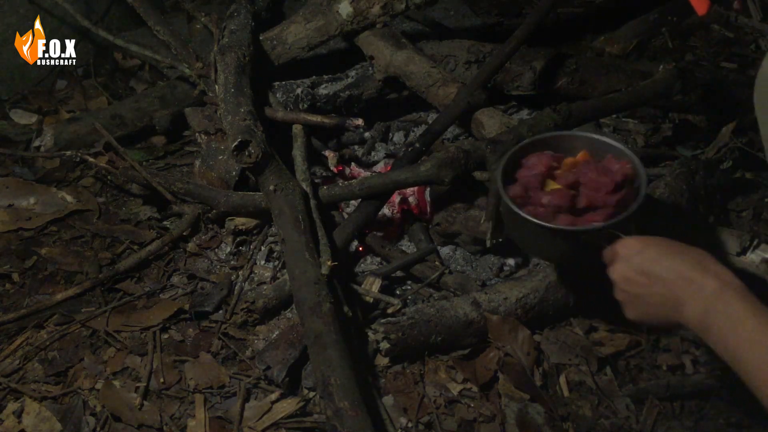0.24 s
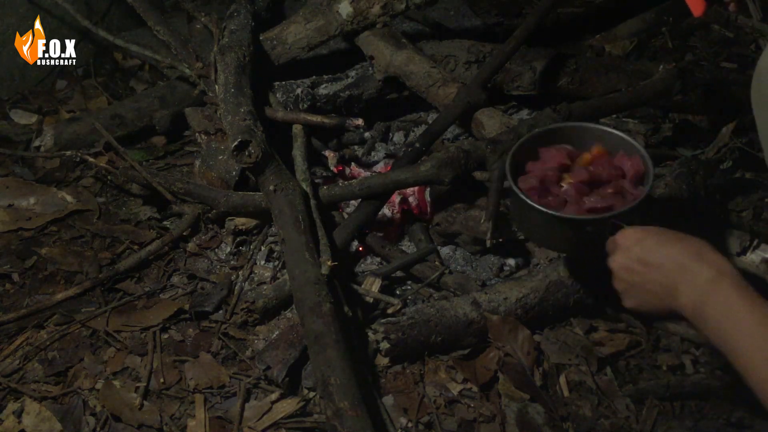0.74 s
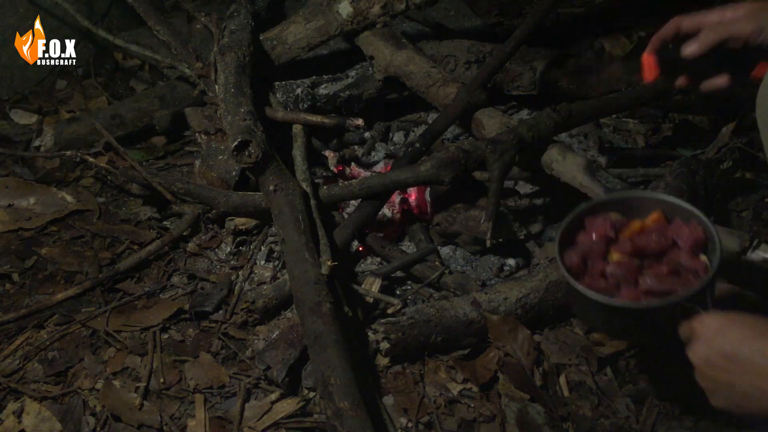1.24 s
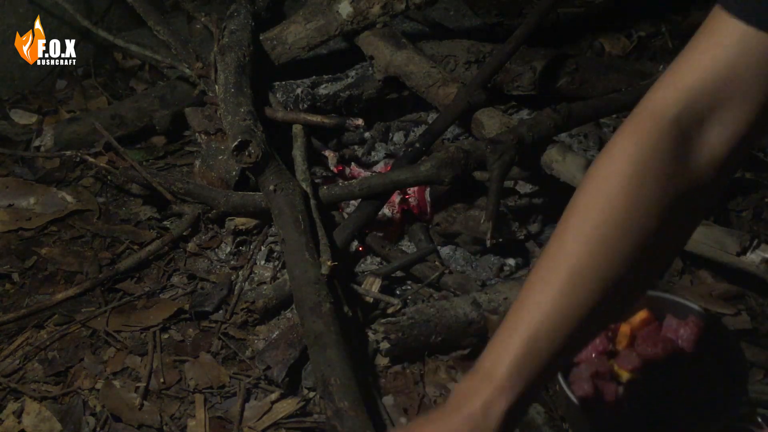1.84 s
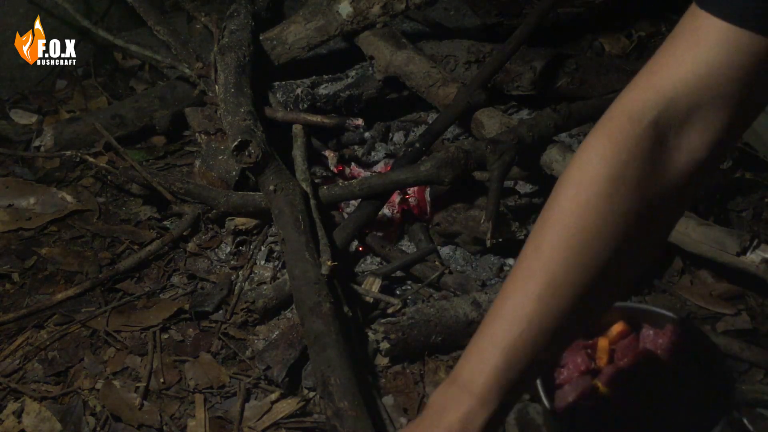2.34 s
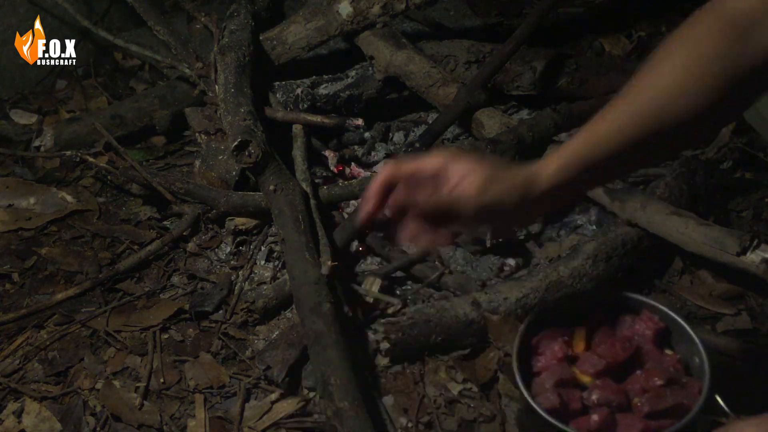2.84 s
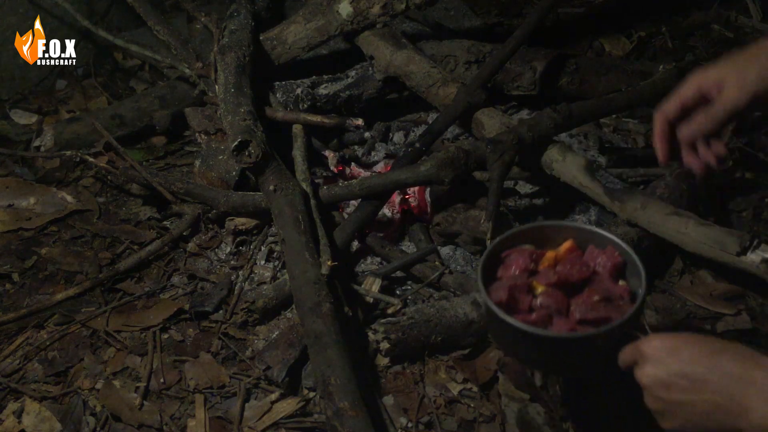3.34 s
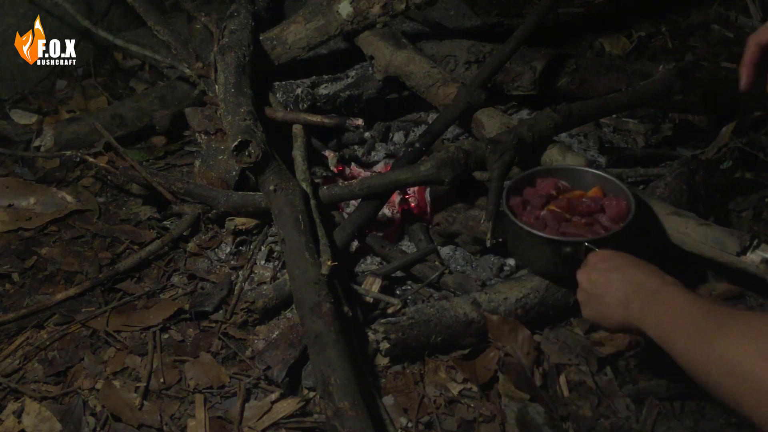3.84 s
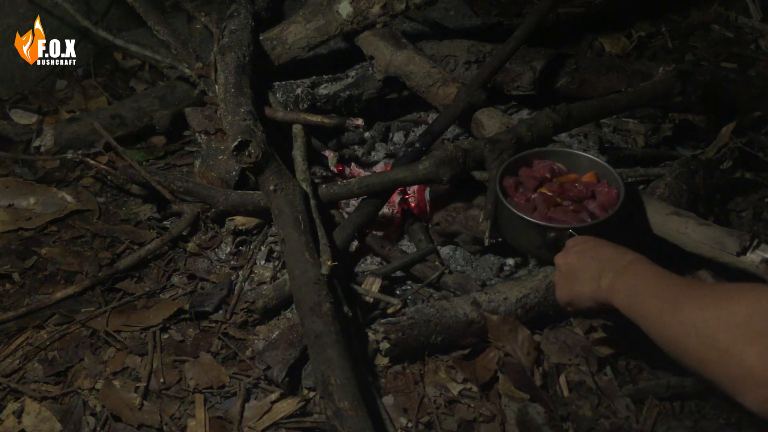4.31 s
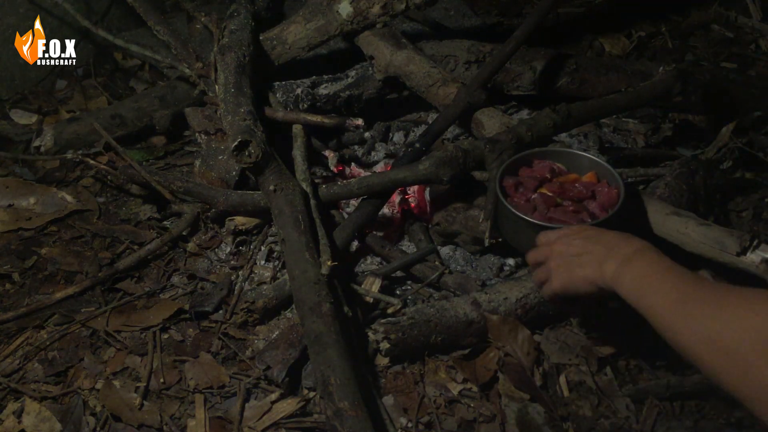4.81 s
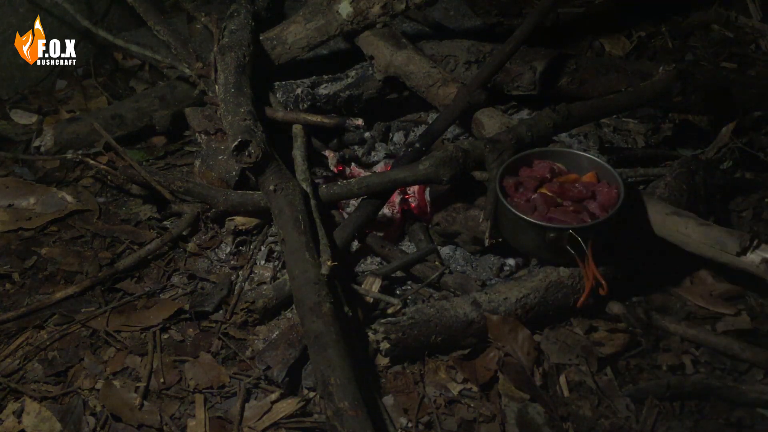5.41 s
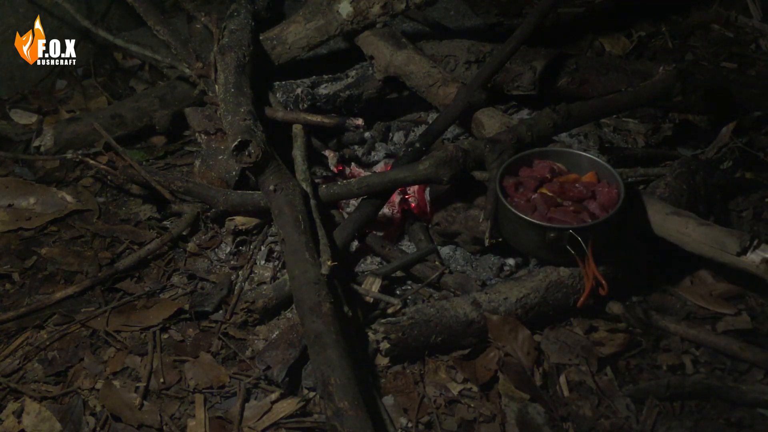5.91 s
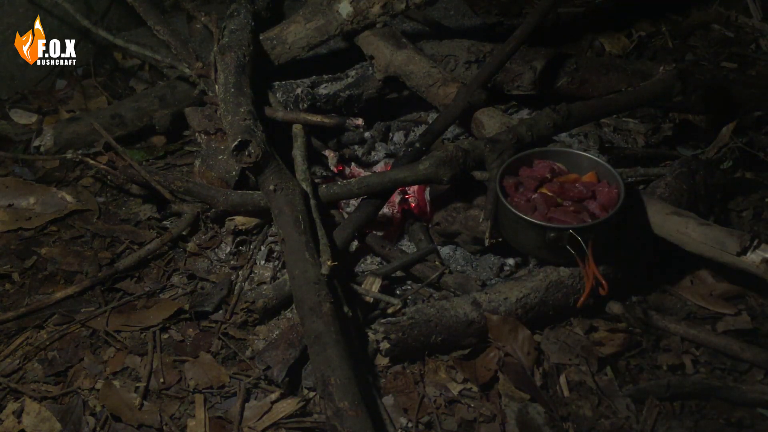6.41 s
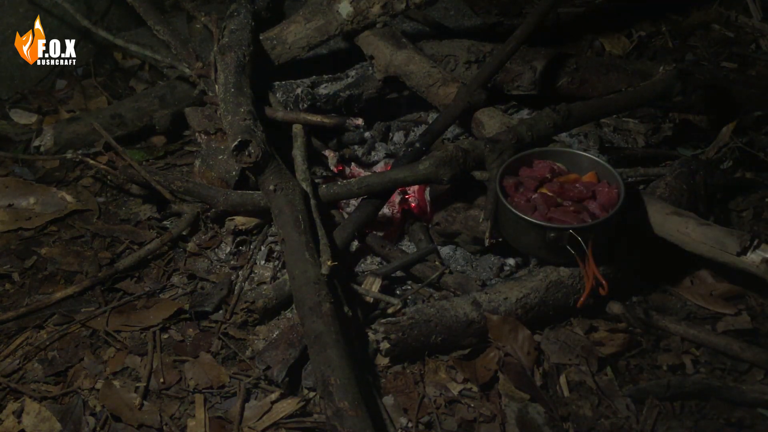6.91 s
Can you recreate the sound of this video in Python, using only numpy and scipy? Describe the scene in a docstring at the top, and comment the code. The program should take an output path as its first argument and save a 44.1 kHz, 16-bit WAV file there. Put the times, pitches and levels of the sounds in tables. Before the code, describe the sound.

One loud hard clack over quiet night insects, then fading wooden rocking taps, a pot scraping onto logs, dry leaf rustles and sharp twig snaps.

```python
"""Night in a jungle camp: crickets shimmer, one trills upward, others chirp in short falling notes.
Something small and hard is put down with a clack and a loose piece of wood rocks to rest, ever faster.
A pot is set on the fire logs, dry leaves rustle and twigs snap.
Hard objects are sums of dying tones, rubbing is many random ticks over coloured noise,
insects are pulsed tones and narrow bands of noise, and the forest air is steady noise."""
import sys
import numpy as np
from scipy import signal
from scipy.fft import rfft, irfft, next_fast_len
from scipy.io import wavfile
from scipy.ndimage import uniform_filter1d, map_coordinates

SR = 44100
rng = np.random.default_rng(int(sys.argv[2]) if len(sys.argv) > 2 else 0)


def persist_wave(psi):
    """Save psi, clipped to +-1, as 16-bit WAV."""
    counts = np.round(np.clip(psi, -1, 1) * 32767).astype(np.int16)
    wavfile.write(sys.argv[1], SR, np.atleast_2d(counts).T)


N = 315315

TIME = np.arange(N) / SR  # seconds, the whole scene
HIT = np.arange(SR // 3) / SR  # seconds, one short hit

# colour of the ground being rubbed or trodden: pitch_hz [Hz], level_db [dB per Hz]
GROUND_COLOUR = [(40, -12), (100, -4), (175, 1.5), (300, -5), (470, -9.5), (720, -1.5), (1300, -11.5),
                 (4000, -49)]


def amp(db):
    """Turn decibels into gain."""
    return 10 ** (np.asarray(db) / 20)


def unit(x):
    """Scale to an average strength (rms) of 1."""
    return x / np.sqrt(np.mean(x ** 2) + 1e-20)


def along(points, hz):
    """Join (Hz, value) points by straight lines on a log pitch axis."""
    f, v = np.transpose(points)
    return np.interp(np.log(hz + 1), np.log(f + 1), v)


def level(points):
    """Gain along (s, dB) points, silent outside them."""
    return amp(np.interp(TIME, *np.transpose(points), left=-140, right=-140))


def swell(peak_s, rise_s, fall_s):
    """An envelope that grows to 1 and dies away."""
    return np.interp(TIME, [peak_s - rise_s, peak_s, peak_s + fall_s], [0, 1, 0]) ** 1.4


def fade(t60):
    """An exponential decay that drops by 60 dB in t60 seconds."""
    return np.exp(-np.log(1000) * HIT / t60)


def build_up(seconds):
    """A soft start: the vibration takes a moment to reach full strength."""
    return 1 - np.exp(-HIT / seconds)


def wobble(rate):
    """A smooth random curve with rate random knots a second."""
    knots = rng.standard_normal(N // 64)
    coarse_s = TIME[::16]
    return np.interp(TIME, coarse_s, map_coordinates(knots, [coarse_s * rate + 2]))


def colour(x, points):
    """Filter to the given (Hz, dB) shape without any sound ahead of its cause."""
    m = 2 * next_fast_len(len(x) // 2 + 4096)
    log_gain = np.log(amp(along(points, np.fft.rfftfreq(m, 1 / SR))))
    # folding the cepstrum onto positive time makes the filter minimum-phase
    cepstrum = irfft(log_gain, m)
    cepstrum[1:m // 2] *= 2
    cepstrum[m // 2 + 1:] = 0
    return irfft(rfft(x, m) * np.exp(rfft(cepstrum)), m)[:len(x)]


def hiss(points):
    """Steady coloured noise of rms 1."""
    return unit(colour(rng.standard_normal(N), points))


def burst(points, t60):
    """A dying puff of coloured noise, its energy set by its decay."""
    puff = colour(rng.standard_normal(len(HIT)) * fade(t60), points)
    return puff * np.linalg.norm(fade(t60)) / np.linalg.norm(puff) / 2


def ring(modes, scatter_db):
    """Dying tones (Hz, dB, t60 s), each struck at a slightly new strength."""
    out = np.zeros(len(HIT))
    for hz, db, t60 in modes:
        strength = amp(db + scatter_db * rng.standard_normal())
        out += strength * fade(t60) * np.sin(2 * np.pi * (hz * HIT + rng.random()))
    return out


def add(track, s, sound):
    """Mix a sound in at time s."""
    part = track[max(round(s * SR), 0):][:len(sound)]
    part += sound[:len(part)]


def grains(points, rate, spread_db, smooth):
    """Random ticks of uneven size, rate a second, over a share of smooth friction, rms 1."""
    chance = rng.random(N)
    size = np.minimum(rng.exponential(size=N), 3)
    ticks = (chance < rate / SR) * amp(spread_db * size) * rng.choice([-1, 1], N)
    return unit(colour(unit(ticks) + smooth * rng.standard_normal(N), points))


def patches(x, depth_db):
    """Ever-changing colour: each leaf and fibre sounds in its own band."""
    z = signal.stft(x, nperseg=256)[2]
    field = uniform_filter1d(rng.standard_normal(z.shape), 4, axis=0)
    field = uniform_filter1d(field, 5, axis=1)
    return unit(signal.istft(z * amp(depth_db * unit(field)), nperseg=256)[1][:N])


def trees(x):
    """A thin diffuse echo among the trunks, in which each band of pitch dies at its own speed."""
    # echo decay: pitch_hz [Hz], t60_s [s]
    echo_decay = [(200, 0.49), (1000, 0.22), (4000, 0.29), (12000, 0.2)]
    hz, t, z = signal.stft(rng.standard_normal(SR // 2), SR, nperseg=256)
    decay = amp(-60 * t / along(echo_decay, hz)[:, None])
    tail = signal.istft(z * decay, SR, nperseg=256)[1]
    late_tail = np.pad(tail, (200, 0))  # samples of silence ahead of the echo
    return signal.fftconvolve(x, late_tail / np.linalg.norm(tail))[:N]


def clack():
    """A hard contact: a crack, a short ring that lingers faintly, a dull push into the ground and grit."""
    # the hard object lands and bounces once: start_s [s], level_db [dB], crack_db [dB in the hit]
    landings = [(2.2549, -7, 1), (2.2678, -13.5, -3.5)]
    # tones of its ring: pitch_hz [Hz], level_db [dB in the ring], t60_s [s]
    hard_modes = [(615, -15, .05), (661, -15, .16), (880, -17, .1), (1090, -19, .04), (1300, -14, .045),
                  (1615, -16, .06), (1870, -11, .05), (1935, -7, .05), (2005, -12, .05), (2256, -11, .04),
                  (2533, 1.5, .04), (2690, -6, .03), (3310, -7, .03), (4183, -8, .038), (4531, -10, .04),
                  (5200, -13, .025), (5770, -11, .025), (6810, -6, .022), (8900, -19, .02),
                  (9630, -21, .02), (12300, -26, .02)]
    # colour of the crack: pitch_hz [Hz], level_db [dB per Hz]
    crack_colour = [(100, -11.5), (250, -1.5), (1200, -2), (2600, -0.5), (4500, -4), (7000, -8.5),
                    (10000, -14), (13000, -13.5), (15500, -24)]
    after_ring_db, after_ring_s = -33.5, .2  # the same tones linger: level in the ring, t60
    lingering = [(hz, mode_db, after_ring_s) for hz, mode_db, t60 in hard_modes]
    push_colour = [(40, -30.5), (170, -1.5), (450, -1), (1200, -5), (3000, -27.5)]
    grit_colour = [(500, -14), (2000, 0.5), (6000, -3), (9000, -5.5), (15000, -20.5)]
    out = np.zeros(N)
    for s, db, crack_db in landings:
        body = np.zeros(len(HIT))
        # neighbouring tones swing in opposite directions, so the ring takes a moment to build
        for k, (hz, mode_db, t60) in enumerate(hard_modes):
            body += (-1) ** k * amp(mode_db) * fade(t60) * np.sin(2 * np.pi * hz * HIT)
        body += amp(after_ring_db) * ring(lingering, scatter_db=1.5)
        body *= build_up(.0007)
        crack = amp(crack_db) * burst(crack_colour, t60=.022)
        push = amp(-27.5) * burst(push_colour, t60=0.28)
        grit = amp(-37) * burst(grit_colour, t60=.24)
        add(out, s, amp(db) * (amp(-3.0) * body + crack + push + grit))
    return colour(out, [(40, -20.0), (110, -6.5), (200, -0.5)])  # thins the bass


def hollow(hz, t60):
    """The low ring of the loose wood: a main tone with a weaker one on either side."""
    modes = [(hz, 0, t60), (hz * 1.13, -8, t60 / 2), (hz * .74, -8, t60 * .7)]
    return ring(modes, scatter_db=2) * build_up(0.0017)


def contact():
    """The brief knock of wood on wood: short upper tones and a puff of noise."""
    # upper tones of the wood: pitch_hz [Hz], level_db [dB in the knock], t60_s [s]
    wood_modes = [(644, -12, 0.033), (1043, 4, 0.025), (1317, -2, .02), (1676, -8.5, 0.024),
                  (2330, -3.5, 0.028)]
    knock_colour = [(150, -13.0), (400, -1), (1300, -2.0), (2500, -4.0), (4000, -31.5), (9000, -48)]
    tones = ring(wood_modes, scatter_db=3.5) * build_up(0.00055)
    return tones + .5 * burst(knock_colour, t60=0.014)


def rocking(count=6):
    """The clack jolts the wood; then each tip comes sooner, set weaker and more damped than the last."""
    # what rings on after the jolt: pitch_hz [Hz], level_db [dB in the ring], t60_s [s]
    jolt_modes = [(661, -14, .14), (930, -17.5, 0.12)]
    # soft bumps that stir only the low ring: start_s [s], pitch_hz [Hz], level_db [dB]
    bumps = [(2.301, 278, -38.5), (2.359, 317, -39), (2.45, 235, -53.5), (2.833, 280, -48),
             (4.299, 299, -49.5), (4.44, 290, -58.5)]
    jolt_s, jolt_db, bump_t60_s = 2.319, -24, .065
    first_tip_s, first_gap_s, gap_shrink = 2.731, .395, .845  # each gap over the one before
    low_db, low_loss_db = -44.5, 0.5  # first low ring, loss per tip
    contact_db, contact_loss_db = -52.5, 1.5  # first contact, loss per tip
    low_hz, low_t60_s, damping = 299, 0.11, 0.86  # damping: each decay over the one before
    out = np.zeros(N)
    jolt = amp(-5.5) * contact() + amp(-1.5) * ring(jolt_modes, scatter_db=1.5)
    add(out, jolt_s, amp(jolt_db) * jolt)
    for k in range(count):
        # the sum of k shrinking gaps
        s = first_tip_s + first_gap_s * (1 - gap_shrink ** k) / (1 - gap_shrink)
        tip_hz = low_hz * (1 + .025 * rng.standard_normal())
        add(out, s, amp(low_db - low_loss_db * k) * hollow(tip_hz, low_t60_s * damping ** k))
        add(out, s, amp(contact_db - contact_loss_db * k) * contact())
    for s, hz, db in bumps:
        add(out, s, amp(db) * hollow(hz, bump_t60_s))
    return out


def pot():
    """The full pot's base catches and slips on bark, crushing dry flakes."""
    # the pot slides onto the logs: time_s [s], level_db [dB]
    slide = [(4.05, -83), (4.154, -67.5), (4.29, -67.5), (4.302, -68), (4.352, -59), (4.378, -75),
             (4.528, -77), (4.6, -97)]
    # two slips crush flakes: peak_s [s], rise_s [s], fall_s [s], level_db [dB]
    slip_rows = [(4.15, 0.074, 0.28, -61), (4.345, .07, 0.075, -57.5)]
    # colour of the scraping base: pitch_hz [Hz], level_db [dB per Hz]
    pot_colour = [(400, -26), (720, -9), (880, -19.5), (1150, -9), (1370, -1), (1520, -8.5), (1660, -3.5),
                  (1900, -17), (2800, -13.5), (5000, -34.5)]
    flake_colour = [(2000, -21), (4500, -5), (7000, 0), (9000, -4.5), (13000, -1), (16000, -2)]
    scrape = grains(pot_colour, rate=420, spread_db=2, smooth=.4)
    flakes = grains(flake_colour, rate=1500, spread_db=1.5, smooth=.45)
    press = grains(GROUND_COLOUR, rate=2600, spread_db=4.5, smooth=0.67)
    slips = sum(amp(db) * swell(s, rise, fall) for s, rise, fall, db in slip_rows)
    return level(slide) * (amp(2) * scrape + amp(-8) * press) + slips * flakes


def rustle():
    """The cook's moves scrape bark, crinkle leaves and crack small fibres; weight crunches the ground."""
    # brushes: peak_s [s], rise_s [s], fall_s [s], bark_db [dB], leaves_db [dB over the bark]
    stroke_rows = [(1.951, .09, 0.16, -66, 1.5), (5.165, .02, .2, -67, 1), (5.355, 0.077, 0.088, -64, 2.5),
                   (5.395, .02, 0.11, -57.5, 7.5), (5.49, 0.15, 0.076, -50.5, -8.5),
                   (5.683, .06, .12, -60, -0.5), (6.04, 0.016, 0.124, -52, -0.5),
                   (6.297, .08, 0.037, -54, -0.5), (6.457, .05, 0.055, -47, -0.5),
                   (6.52, 0.32, 0.12, -60.5, 2.5), (6.634, .07, 0.038, -53, -2),
                   (6.905, .02, 0.058, -58, -2), (7.11, .03, 0.076, -65, 1.5)]
    # ground crunches: peak_s [s], rise_s [s], fall_s [s], level_db [dB]
    treads = [(6.034, 0.013, 0.031, -53.5), (6.081, .012, 0.044, -58.5), (6.456, 0.037, .07, -59)]
    # colour of rubbed bark: pitch_hz [Hz], level_db [dB per Hz]
    bark_colour = [(400, -18), (850, -19.5), (1150, -2.5), (1450, 0), (2000, -2.5), (2600, -1),
                   (4000, -7.5), (6000, -16), (12000, -40)]
    # colour of dry leaves: pitch_hz [Hz], level_db [dB per Hz]
    leaf_colour = [(2000, -23), (4500, -1.5), (6500, -2), (9000, -5.5), (13000, -5), (16000, -7.5)]
    fibre_colour = [(1000, -21), (3000, -0.5), (8000, -4), (16000, -9)]
    press_db = -18.5  # the ground under a stroke, over the bark
    strokes = [(amp(db) * swell(s, rise, fall), amp(leaves_db))
               for s, rise, fall, db, leaves_db in stroke_rows]
    # overlapping strokes add as energies
    effort = np.sqrt(sum(push ** 2 for push, leafy in strokes))
    crinkle = np.sqrt(sum((push * leafy) ** 2 for push, leafy in strokes))
    weight = sum(amp(db) * swell(s, rise, fall) for s, rise, fall, db in treads)
    low = grains(GROUND_COLOUR, rate=2200, spread_db=6.5, smooth=0.5)
    mid = patches(grains(bark_colour, rate=1200, spread_db=3.5, smooth=.35), depth_db=3.5)
    high = patches(grains(leaf_colour, rate=1600, spread_db=4.5, smooth=.45), depth_db=2.5)
    fibres = grains(fibre_colour, rate=130, spread_db=3, smooth=0)
    scraping = effort * (mid + amp(press_db) * low)
    crinkling = crinkle * (high + amp(-6.5) * fibres)
    return amp(2.2 * wobble(110)) * (scraping + crinkling + weight * low)


def thumps():
    """Soft earth takes a weight with a few low, heavily damped swings."""
    # weight on the soft ground: start_s [s], level_db [dB]
    weights = [(6.030, -44.5), (6.074, -46.5), (6.086, -43), (6.459, -51)]
    out = np.zeros(N)
    for s, db in weights:
        swings = ring([(175, -1.5, 0.051), (110, -9.0, 0.067)], scatter_db=1)
        add(out, s, amp(db) * swings * build_up(0.0021))
    return out


def sticks():
    """Soft double knocks, each duller than the last; dry sticks click together in short hollow taps."""
    # dull double knocks: start_s [s], level_db [dB], gap_s [s to the second contact]
    knocks = [(.166, -39, .022), (.402, -49, 0.019), (.625, -46.5, 0.019), (.842, -47.5, 0.018),
              (1.074, -48.5, 0.01)]
    # colour of a knock before dulling: pitch_hz [Hz], level_db [dB per Hz]
    knock_colour = [(100, -15), (180, -2.5), (280, -2.5), (480, 0), (900, -6.5), (1300, 2), (1800, -6),
                    (4000, -4), (10000, -13)]
    # dry taps: start_s [s], level_db [dB]
    taps = [(1.939, -44), (5.529, -36.5), (6.030, -40), (6.039, -37), (6.058, -37), (6.0911, -25.5),
            (6.628, -30.5), (6.918, -31)]
    # colour of a tap: pitch_hz [Hz], level_db [dB per Hz]
    tap_colour = [(150, -24), (700, -16), (1100, -1.5), (1550, 5), (2000, -3.5), (2500, 1.5), (3300, -15),
                  (6000, -16), (15000, -60)]
    knock_t60_s, first_edge_hz, dulling_hz = 0.055, 1700, 192  # decay, treble edge, its fall per knock
    out = np.zeros(N)
    for k, (s, db, gap) in enumerate(knocks):
        edge_hz = first_edge_hz - dulling_hz * k
        soft = [(edge_hz, 7), (edge_hz * 2, -13), (edge_hz * 5, -28)]
        for start in (s, s + gap):
            add(out, start, amp(db) * colour(burst(knock_colour, knock_t60_s), soft))
    for s, db in taps:
        add(out, s, amp(db) * burst(tap_colour, t60=0.02))
    return out


def snaps():
    """Twigs and embers snap: a fibre breaks in a bright tick with a little body and a crumbling tail."""
    # the loudest snaps: start_s [s], level_db [dB], body_db [dB relative to the crack]
    breaks = [(1.763, -49, 3), (1.885, -41.5, -7), (1.966, -38.5, -14), (4.003, -39, -23.5),
              (4.3495, -30.5, -25), (5.159, -45.5, 8), (5.191, -20.5, -4.5), (5.3889, -34.5, 0.5),
              (5.809, -44.5, -0.5), (5.938, -33.5, -23), (6.4278, -22, -12.5), (6.438, -27, 0),
              (6.523, -31, 0.5), (6.551, -37, -1), (6.605, -41, -2)]
    bright = [(500, -68), (1500, -57.5), (4000, -9.5), (8000, 1.5), (13000, -1.5), (16000, -1.5)]
    body_colour = [(300, -48), (1400, -40), (2100, -8), (2900, -3.5), (5000, -2.5), (9000, -13.5)]
    out = np.zeros(N)
    for s, db, body_db in breaks:
        crack = burst(bright, t60=.005) + amp(-17.5) * burst(bright, t60=0.043)
        body = burst(body_colour, t60=0.0107)
        add(out, s, amp(db) * (crack + amp(body_db) * body))
    return out


def embers():
    """Sparse faint ticks from the smouldering fire."""
    ember_colour = [(800, -24.5), (3000, -2), (9000, 1.0), (16000, -3.5)]
    return amp(-86.5) * grains(ember_colour, rate=9, spread_db=5.5, smooth=0)


def trill(pitch_hz, loudness, pulse_hz, sweep_hz, scatter):
    """The tone falls during each wing stroke; echoes from the foliage fill the gaps."""
    stroke = np.cumsum(pulse_hz * (1 + .008 * wobble(8))) / SR + .05 * wobble(60)
    u = stroke % 1  # place within the stroke, 0 to 1
    phase = 2 * np.pi * np.cumsum(pitch_hz + sweep_hz * (.5 - u)) / SR
    tone = np.sin(phase + .35 * wobble(60))
    wings = unit(np.sin(np.pi * u) ** 2 * tone * amp(1.7 * wobble(40)))
    song = loudness * wings
    return (song + scatter * trees(song)) / np.hypot(1, scatter)


def trills():
    """A long rising trill, a short reply, a thin high trill and a bush cricket's rasp of noise."""
    # loudness of the rising trill: time_s [s], level_db [dB]
    rising_level = [(3.55, -90), (3.64, -72), (4.15, -56.5), (4.69, -63), (5.05, -53.5), (5.24, -61),
                    (5.38, -50), (5.5, -59), (5.6, -82.5)]
    # its pitch climbs in two steps: time_s [s], pitch_hz [Hz]
    rising_pitch = [(3.6, 4030), (3.9, 4075), (4.15, 4215), (4.55, 4220), (5.03, 4465), (5.55, 4450)]
    rasp_colour = [(6500, -39.5), (8000, -11), (8700, 0.0), (10000, -9), (13000, -13), (16000, -22.5)]
    rising_gain = amp(-1.2 + 0.91 * wobble(14)) * level(rising_level)
    reply_gain = amp(-60) * swell(6.68, rise_s=.36, fall_s=0.2)
    thin_gain = amp(-64.5) * swell(6.89, rise_s=.09, fall_s=0.12)
    rising_hz = np.interp(TIME, *np.transpose(rising_pitch))
    reply_hz = np.interp(TIME, [6.5, 6.72], [4090, 4205])
    rising = trill(rising_hz, rising_gain, pulse_hz=63.5, sweep_hz=330, scatter=.75)
    reply = trill(reply_hz, reply_gain, pulse_hz=52, sweep_hz=200, scatter=.9)
    thin = trill(7315, thin_gain, pulse_hz=110, sweep_hz=150, scatter=.9)
    rasp = amp(-65.5) * swell(4.86, rise_s=.2, fall_s=.13) * hiss(rasp_colour)
    return rising + reply + thin + rasp


def notes(rows, start_hz, end_hz, length, bend):
    """Short tones of length seconds that slide down in pitch, one per (s, dB) row."""
    out = np.zeros(N)
    u = np.linspace(0, 1, int(length * SR))
    for s, db in rows:
        hz = end_hz + (start_hz - end_hz) * (1 - u) ** bend
        hz *= 1 + 0.0013 * rng.standard_normal()
        envelope = np.sqrt(np.abs(np.sin(np.pi * u)))
        add(out, s, amp(db) * envelope * np.sin(2 * np.pi * np.cumsum(hz) / SR))
    return out * amp(3.1 * wobble(240))


def chirpers():
    """A tiny high chirper slows down at its own pace; later a lower one calls three times."""
    # pace of the high chirper: time_s [s], rate [chirps per s]
    chirp_rate = [(.158, 18.6), (1.08, 18.6), (1.23, 14.1), (2.55, 13)]
    # its loudness: time_s [s], level_db [dB]
    chirp_level = [(.16, -71.5), (.86, -70.5), (1.48, -70), (1.54, -77)]
    peep_start_s, peep_every_s, peep_db = 6.686, .189, -59
    # a chirp starts each time the running count passes a whole number
    turns = np.cumsum(np.interp(TIME, *np.transpose(chirp_rate), left=0, right=0)) / SR
    times = TIME[np.searchsorted(turns, np.arange(int(turns[-1])), side="right")]
    chirp_rows = zip(times, np.interp(times, *np.transpose(chirp_level)))
    chirps = notes(chirp_rows, start_hz=8560, end_hz=8150, length=.02, bend=1)
    peep_rows = [(peep_start_s + k * peep_every_s, peep_db) for k in range(3)]
    peeps = notes(peep_rows, start_hz=4930, end_hz=4500, length=.038, bend=2)
    return chirps + peeps + amp(-3.5) * trees(peeps)


def far_calls():
    """Distance smears each call into a soft narrow band; one far singer holds its note for two seconds."""
    # far calls blurred by the forest: peak_s [s], pitch_hz [Hz], level_db [dB]
    calls = [(1.335, 2700, -70.5), (2.22, 2720, -63), (3.645, 2520, -67.5), (5.365, 1110, -61.5),
             (6.56, 2680, -62.5), (6.798, 2880, -70)]
    side_s = .14  # rise time, and fall time, of each call

    def band(hz):
        """Noise gathered around one pitch."""
        return hiss([(hz * .65, -35), (hz * .91, -9), (hz, 0), (hz * 1.09, -9), (hz * 1.5, -35)])

    out = sum(amp(db) * swell(s, side_s, side_s) ** 2 * band(hz) for s, hz, db in calls)
    held_gain = level([(0, -83.5), (1.55, -79.5), (2.1, -85)]) * amp(1.1 * wobble(4))
    return out + held_gain * band(3375)


def forest():
    """Still night air and a far cricket chorus, bands of noise that swell in short phrases."""
    # colour of the night air: pitch_hz [Hz], level_db [dB per Hz]
    air_colour = [(30, -4.5), (55, 2.5), (92, -0.5), (180, -7), (300, -9), (400, -11.5), (550, -16.5),
                  (900, -13.5), (2600, -13), (3600, -15), (5000, -18.5), (6600, -17), (7700, -23),
                  (12000, -24), (16000, -25.5)]
    upper_colour = [(6400, -40), (6900, 3.5), (7200, -8.0), (7600, -23.5), (8100, -16.5),
                    (8330, -0.5), (8600, -20.5), (9500, -50)]
    air = amp(-67.5 + 0.306 * wobble(5.3)) * hiss(air_colour)
    chorus = hiss([(5600, -50.0), (6130, -16.5), (6260, 1.5), (6390, -17.5), (6800, -44.5)])
    phrases_db = 3.5 * np.sin(2 * np.pi * 3.25 * TIME + 2.4) + 2.5 * wobble(18)
    upper = amp(-84.5 + 0.87 * wobble(20)) * hiss(upper_colour)
    return air + amp(-80.5 + phrases_db) * chorus + upper


def scene():
    """The camp close by with its faint echo, the forest all round."""
    camp = clack() + rocking() + pot() + rustle() + thumps() + sticks() + snaps() + embers()
    insects = trills() + chirpers() + far_calls()
    return (camp + amp(-21.0) * trees(camp) + insects + forest())[None]


def record(dry):
    """Cut the deepest rumble below 40 Hz and keep nothing above the top of the band."""
    top_hz = 15800
    dry = signal.sosfilt(signal.butter(6, 40, "high", fs=SR, output="sos"), dry)
    m = next_fast_len(N + SR // 2)
    return irfft(rfft(dry, m) * (np.fft.rfftfreq(m, 1 / SR) < top_hz), m)[:, :N]


dry = scene()
out = record(dry)
persist_wave(out)
```